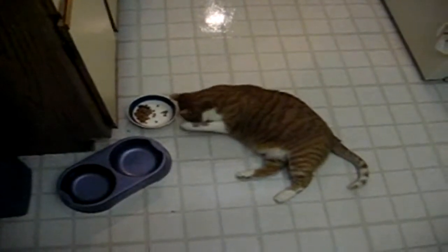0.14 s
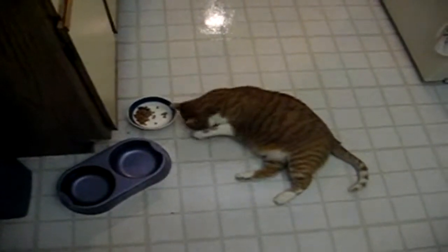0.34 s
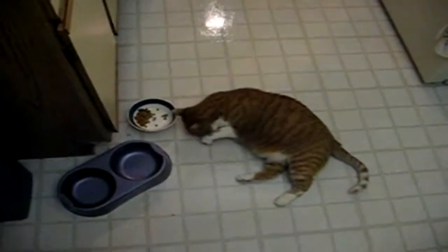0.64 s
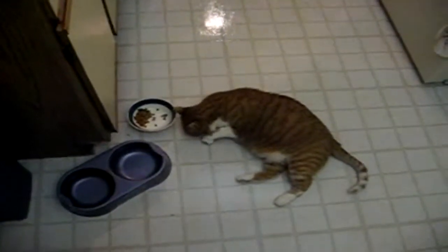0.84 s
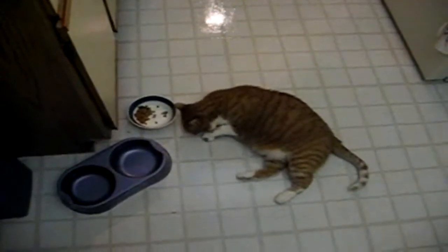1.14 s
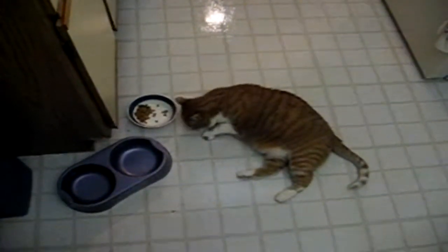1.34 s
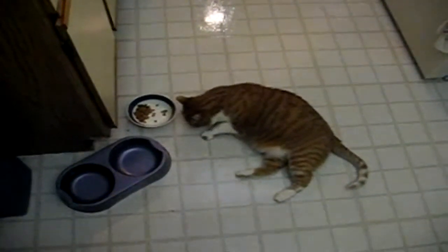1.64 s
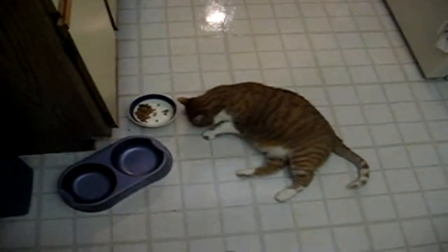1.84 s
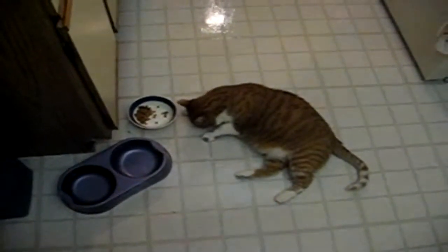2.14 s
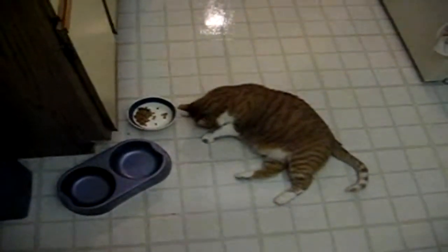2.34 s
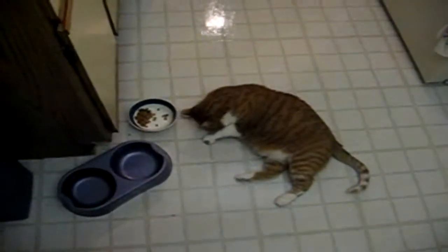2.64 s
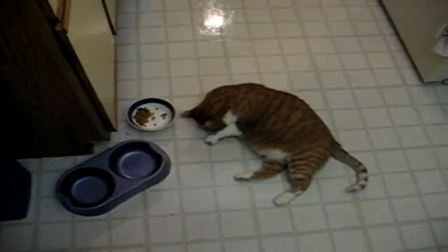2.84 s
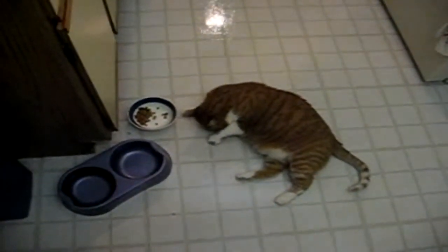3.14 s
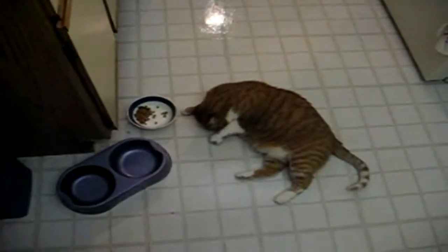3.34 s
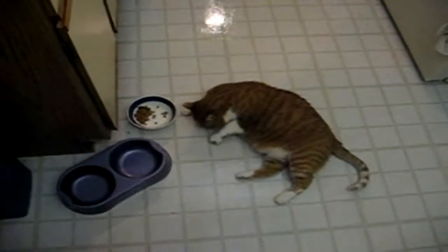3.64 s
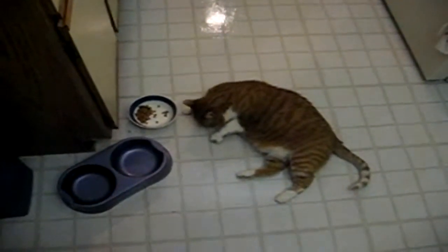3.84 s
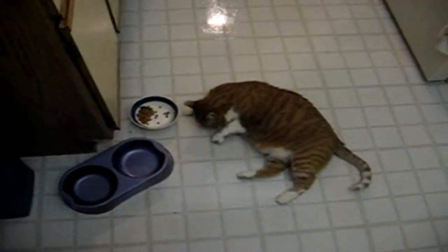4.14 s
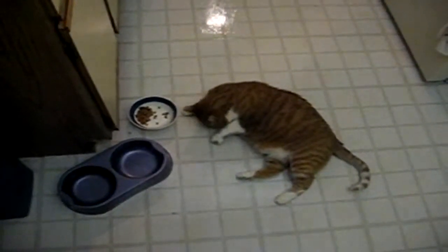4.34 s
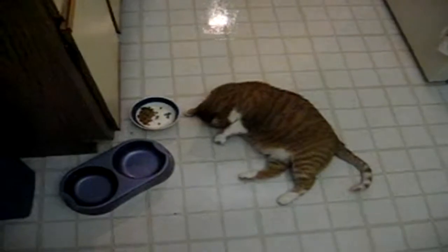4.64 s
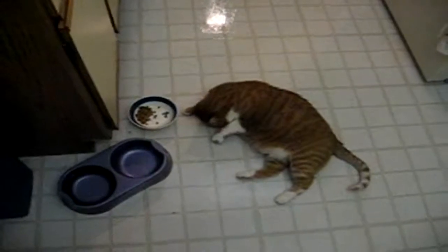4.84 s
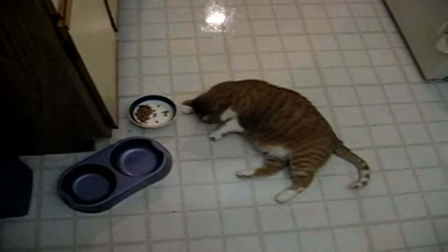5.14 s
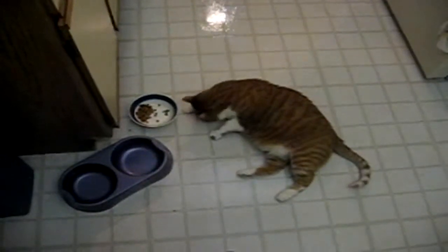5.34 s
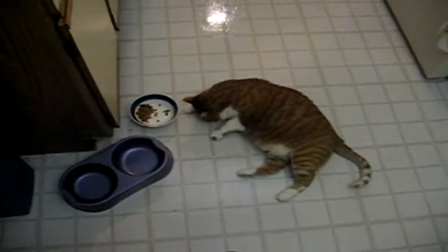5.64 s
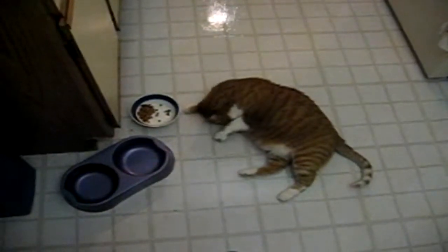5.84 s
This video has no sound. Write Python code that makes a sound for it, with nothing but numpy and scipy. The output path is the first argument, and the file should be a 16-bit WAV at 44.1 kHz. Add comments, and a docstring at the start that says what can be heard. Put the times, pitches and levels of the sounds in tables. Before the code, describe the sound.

A household machine runs throughout in a hard-floored kitchen: a low hum near 130 Hz with fluttering overtones and a dull airy hiss. Roughly every half second, from 0.3 to 6 s, the hum sags sharply in level and slightly in pitch, while soft watery churning and panel rumble swell, with a weaker swell between strokes. A cat bites dry food: a small crack at the very start, clear crisp snaps with crumbling at 1.7, 2.0 and 2.35 s, and a very faint one at 3.1 s, each with a short room echo. A soft, dull double bump on the floor comes at 0.6 s, with faint fur brushes then and at about 1.1, 2.5, 3.1, 3.6 and 5.2 s. The muffled mono sound cuts to silence for about a tenth of a second at 0.1, 1.5, 2.9, 4.3 and 5.7 s, with faint ticks at the edges.

```python
"""A kitchen appliance hums throughout, a drooping sine with wavering tones, over a hiss of shaped noise.
Twice a second or so the hum sags under load and a soft churning of noise bands swells.
A cat on the tiles cracks dry food (tone bursts, ringing crumbs) from the start to about 3 s; at 0.6 s it
bumps the floor (decaying modes), and now and then its fur brushes it (swelling noise).
A small, dull-sounding camera hears it; from 0.1 s its sound stalls briefly every 1.4 s, then resumes."""
import sys
import numpy as np
from scipy import signal
from scipy.fft import rfft, irfft
from scipy.io import wavfile
from scipy.ndimage import uniform_filter1d

SR = 44100
rng = np.random.default_rng(int(sys.argv[2]) if len(sys.argv) > 2 else 0)


def pcm_store(signal):
    """Save signal as 16-bit PCM."""
    levels = np.round(np.clip(np.atleast_2d(signal), -1, 1) * 32767)
    wavfile.write(sys.argv[1], SR, levels.astype(np.int16).T)


N = 263718
TIME = np.arange(N) / SR

# machine strokes: t/s, push re its swell/dB, return re its swell/dB, hum sag depth/dB, sag half-width/s
STROKES = [(.335, -2, 1, 13, 0.097), (.805, -2.5, 0.5, 9, 0.076), (1.292, -.5, -0.5, 17.5, .068),
           (1.885, -1.5, -3.5, 5, .085), (2.35, 0.5, -1.5, 9, 0.061), (2.812, -0.5, -2, 5.5, 0.098),
           (3.388, 0.5, 0.5, 10.5, 0.071), (3.861, 0, -2, 12, 0.054), (4.411, -2.5, 0.5, 13.5, 0.085),
           (4.868, -2.5, 0.5, 11.5, 0.086), (5.364, -3.5, -1.5, 11.5, 0.078),
           (5.96, -0.5, -2.5, 5.5, 0.097)]
# cabinet resonances colouring the machine's noise: f/Hz, full width at half lift/Hz, lift/dB
CABINET = [(164.5, 7.2, 1), (195.7, 26, 5), (239.4, 8.9, 5), (264, 17, 7), (303.2, 7.8, 10.5),
           (323.3, 12, 9.5), (364.5, 35, 8.5), (421, 54, 4), (467.6, 11, 6.5), (523, 5.3, 13),
           (537, 1.8, 10.5), (637.6, 22, -5), (651.4, 14, 9.5), (710.7, 8.4, 4.5), (760, 60, 2.5),
           (890, 31, 0.5), (982, 45, 2.5), (1073, 100, 1.5), (1202, 44, 4.5), (1304, 37, 5.5),
           (1680, 78, 3.5), (1827, 40, 8), (1960, 77, 5), (2072, 79, 4), (2740, 70, 4), (3570, 83, 2.5),
           (3870, 100, 2.5)]


def motor(effort, drift=0.0015, flutter_db=1.5, whine_drift_hz=2.5, waver_db=0.48):
    """Fundamental sags and droops under load; overtones and side tones hold on and flutter."""
    hum_hz, droop_hz, overtone_base_hz = 131.15, 3.0, 130.8
    hum_db = -25.5  # rms, unloaded
    # overtones of the hum: multiple, rms level/dB
    overtones = [(2, -42), (3, -40), (4, -50.5), (7, -58), (8, -55.5), (9, -56), (10, -62.5), (13, -61.5),
                 (14, -64.5)]
    # other wavering tones of the machine: f/Hz, rms level/dB
    whines = [(63, -47.5), (80, -54.5), (168, -51.5), (208, -50.5), (644, -60.5), (952, -58.5),
              (1209, -57.5), (1342, -61.5), (1452, -62.5), (1581, -60.5), (1984, -60.5), (2606, -64),
              (3930, -71)]

    speed = 1 + drift * walk(9)
    hum_turns = np.cumsum(speed * (hum_hz - droop_hz * effort)) / SR
    hum_gain = undb(hum_db + waver_db * walk(9.4)) * (1 - effort)
    out = hum_gain * np.sin(2 * np.pi * hum_turns)

    base_phase = 2 * np.pi * np.cumsum(overtone_base_hz * speed) / SR
    for multiple, db in overtones:
        gain = undb(db + flutter_db * walk(14))
        out += gain * np.sin(multiple * base_phase + 2 * np.pi * rng.random())

    for hz, db in whines:
        turns = np.cumsum(hz + whine_drift_hz * walk(16)) / SR + rng.random()
        out += undb(db + flutter_db * walk(12)) * np.sin(2 * np.pi * turns)
    return np.sqrt(2) * out  # rms to peak


def load(sharpness=1.4):
    """Share of the hum taken by the strokes, 0-1: builds to a point at each stroke and lets go."""
    free = 1
    for s, _, _, sag_db, width_s in STROKES:
        sag_shape = np.exp(-np.abs(since(s) / width_s) ** sharpness)
        free = free * (1 - (1 - undb(-sag_db)) * sag_shape)
    return 1 - free


def churning(slosh_db=-46.0, panel_db=-41):
    """Water sloshes in the cabinet and shakes its panels; both surge with each stroke and its return."""
    stroke_period_s = 0.469
    # swell of a stroke: length/s, churn level/dB, rumble level/dB
    push_swell = (0.082, -34.5, -32.5)
    # weaker return half a period earlier: length/s, churn level/dB, rumble level/dB
    return_swell = (0.12, -41, -35.5)
    # slosh spectrum: f/Hz, relative density/dB
    churn_spectrum = [(200, -25), (330, 2.5), (420, -4), (560, 2.5), (700, -4), (900, -9), (1300, -14.5),
                      (2500, -24), (6000, -51.5)]
    # panel spectrum: f/Hz, relative density/dB
    rumble_spectrum = [(60, -20), (130, 3.5), (175, -1.5), (215, 5), (280, -3), (350, -9), (450, -13),
                       (900, -48)]

    slosh_power, panel_power = undb(slosh_db) ** 2, undb(panel_db) ** 2
    for s, push_db, return_db, _, _ in STROKES:
        t = since(s)
        surges = [(0, push_db, push_swell), (stroke_period_s / 2, return_db, return_swell)]
        for lead_s, db, (length_s, churn_db, rumble_db) in surges:
            surge = swell(t + lead_s, length_s)
            slosh_power = slosh_power + surge * undb(db + churn_db) ** 2
            panel_power = panel_power + surge * undb(db + rumble_db) ** 2
    slosh = np.sqrt(slosh_power) * noise(churn_spectrum, CABINET)
    panels = np.sqrt(panel_power) * noise(rumble_spectrum, CABINET)
    return slosh + panels


def cat():
    """Bites echo in the room; the body bumps the floor dully and its fur brushes the tiles."""
    # floor modes under a soft bump: f/Hz, level re bump/dB, t60/s
    floor_modes = [(195, -1.5, 0.14), (166, -9.5, .2), (328, -12, .09), (435, -12.5, .07),
                   (620, -21.5, .07)]
    # soft bumps on the floor: t/s, level/dB
    bumps = [(.589, -24), (0.605, -19), (.634, -19)]
    # fur brushing the floor: t/s, length/s, peak level/dB
    rustles = [(0.072, 0.11, -54), (.61, 0.14, -49), (1.106, 0.076, -51), (2.546, 0.13, -51.5),
               (3.117, 0.056, -50.5), (3.622, 0.09, -49), (5.203, 0.089, -48)]
    # fur spectrum: f/Hz, relative density/dB
    fur_spectrum = [(800, -21.5), (2000, 7), (2900, 4), (4200, -3), (6500, -34.5)]

    out = kitchen(chewing())
    thud = modes(floor_modes)
    for s, db in bumps:
        add(out, s, undb(db) * thud)
    brushing = sum(undb(db) * swell(TIME - s, length_s) for s, length_s, db in rustles)
    return out + noise(fur_spectrum) * brushing


def chewing(crumble_t60_s=0.082, crumb_share=0.027, knock_hz=830, knock_t60_s=0.015):
    """A kernel snaps with a sharp tick and a jaw knock, then crumbles in tiny cracks."""
    snap_s = 0.00019
    # bites: t/s, snap level/dB, snap f/Hz, jaw knock re snap/dB, crumbling re twice snap/dB
    bites = [(.039, -32, 4500, -15, -7.5), (1.7007, -23, 3930, -16, -11), (2.0246, -22, 3800, -2.5, -1.5),
             (2.354, -27, 3180, -0.5, -13.5), (3.107, -44, 3800, -8, -4)]
    # modes of the crumbling kernel: f/Hz, relative level/dB, t60/s
    kernel_modes = [(830, -3.5, 0.017), (1120, -5.5, .02), (1500, -7, .01), (1994, 0, 0.011),
                    (3050, -4, 0.013), (3740, -4, 0.002), (4400, -9, 0.012), (6050, -8, 0.0043)]

    out, decay = np.zeros(N), fade(crumble_t60_s)
    t = TIME[:len(decay)]
    kernel = modes(kernel_modes)
    kernel = kernel / np.abs(kernel).max()
    burst = (t / snap_s / 2) ** 2 * np.exp(2 - t / snap_s)  # a few cycles long, peak 1
    for s, db, snap_hz, knock_db, crumble_db in bites:
        snap = burst * np.sin(2 * np.pi * snap_hz * t)
        knock = undb(knock_db) * ring(knock_hz, knock_t60_s)
        cracks = decay * rng.choice([-1, 1], len(t)) * (rng.random(len(t)) < crumb_share)
        crumbs = signal.fftconvolve(cracks / np.linalg.norm(cracks), kernel)[:len(t)]
        add(out, s, undb(db) * (snap + knock + 2 * undb(crumble_db) * crumbs))
    return out


def kitchen(x, t60_s=0.29, wet_db=-6, echo_s=0.0066, echo_db=-9, floor_s=0.0047, floor_db=-9):
    """Slaps from the floor and the nearest cupboard, and a short tail off the tiles."""
    decay = fade(t60_s)
    tail = decay * rng.standard_normal(len(decay))
    response = undb(wet_db) * tail / np.linalg.norm(tail)
    response[0] += 1  # direct sound
    response[int(floor_s * SR)] += undb(floor_db)
    response[int(echo_s * SR)] += undb(echo_db)
    return signal.fftconvolve(x, response)[:N]


def hiss(level_db=-38.5):
    """Even rush of air through the cabinet."""
    # air spectrum: f/Hz, relative density/dB
    air_spectrum = [(20, 5.5), (40, -2), (100, -3.5), (300, -10), (700, -14.5), (1100, -11.5), (1420, -17),
                    (1900, -17.5), (2400, -18.5), (3100, -21), (3900, -21.5), (4400, -23.5), (6000, -29.5),
                    (6800, -48)]
    return noise(air_spectrum, CABINET) * undb(level_db)


def undb(db):
    """Decibels to gain."""
    return 10 ** (np.asarray(db) / 20)


def unit(x):
    """Scale to rms 1."""
    return x / np.sqrt(np.mean(x ** 2))


def walk(rate_hz):
    """Random levels held 1 / rate_hz and slewed twice; rms 1."""
    k = max(int(SR / rate_hz), 2)
    steps = np.repeat(rng.standard_normal(N // k + 1), k)
    slewed = uniform_filter1d(uniform_filter1d(steps, k), k)
    return unit(slewed[:N])


def noise(points, resonances=()):
    """Noise of rms 1 through (f/Hz, dB) points, lifted or cut at each resonance."""
    hz, db = np.transpose(points)
    bins_hz = np.maximum(np.fft.rfftfreq(N, 1 / SR), 1)
    colour_db = np.interp(np.log(bins_hz), np.log(hz), db)
    for centre_hz, width_hz, lift_db in resonances:
        colour_db += lift_db / (1 + (2 * (bins_hz - centre_hz) / width_hz) ** 4)
    white = rfft(rng.standard_normal(N))
    return unit(irfft(white * undb(colour_db), N))


def fade(t60_s):
    """Exponential decay, cut at a quarter of a second."""
    return np.exp(-np.log(1000) * TIME[:SR // 4] / t60_s)


def ring(hz, t60_s):
    """One struck mode: a decaying sine."""
    decay = fade(t60_s)
    return decay * np.sin(2 * np.pi * hz * TIME[:len(decay)])


def modes(table):
    """Struck modes summed with alternating sign."""
    return sum((-1) ** k * undb(db) * ring(hz, t60_s) for k, (hz, db, t60_s) in enumerate(table))


def add(out, s, sound):
    """Mix a sound in at time s."""
    i = max(int(s * SR), 0)
    out[i:i + len(sound)] += sound[:N - i]


def swell(t, length_s):
    """Gaussian rise and fall around t = 0; length_s is the full width at 1/e."""
    return np.exp(-(2 * t / length_s) ** 2)


def live():
    """True wherever the sound is not cut out."""
    # dropouts: start/s, end/s
    dropouts = [(.1177, .2293), (1.5106, 1.6227), (2.9040, 3.0155), (4.2971, 4.409), (5.6897, 5.8025)]
    return ~np.any([(TIME >= start) & (TIME < end) for start, end in dropouts], axis=0)


def since(s):
    """Seconds of live sound since time s; after a dropout the rhythm resumes where it stopped."""
    clock = np.cumsum(live()) / SR
    return clock - np.interp(s, TIME, clock)


def scene():
    """Machine and cat, in one channel."""
    return (motor(load()) + churning() + hiss() + cat())[None]


def record(dry, offset=-0.011):
    """Narrow-band input with a small offset; each dropout cuts it to silence with a faint tick."""
    mic_top_hz, top_hz = 6735, 15900
    mic_lowpass = signal.ellip(8, .2, 70, mic_top_hz, fs=SR, output="sos")
    output_lowpass = signal.ellip(8, .2, 70, top_hz, fs=SR, output="sos")
    heard = signal.sosfilt(mic_lowpass, dry) + offset
    return signal.sosfilt(output_lowpass, heard * live())


dry = scene()
out = record(dry)
pcm_store(out)
```